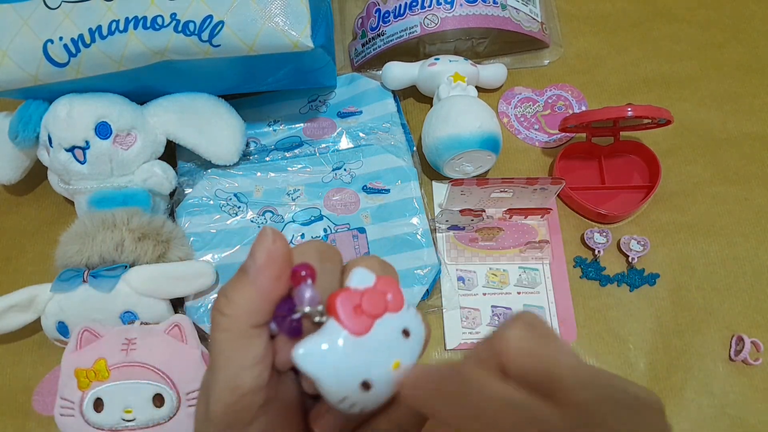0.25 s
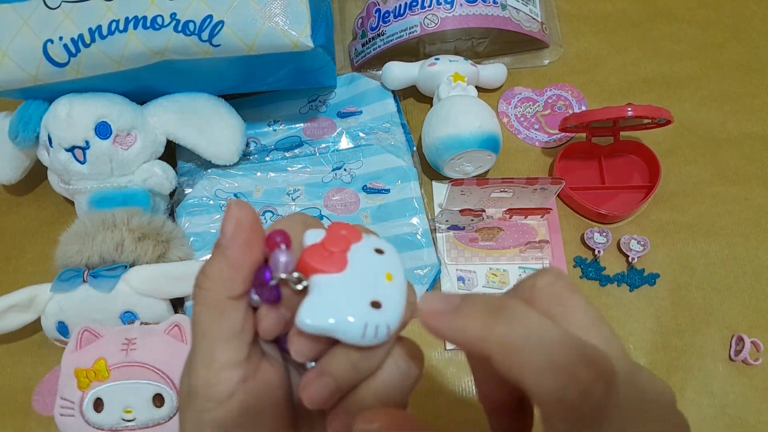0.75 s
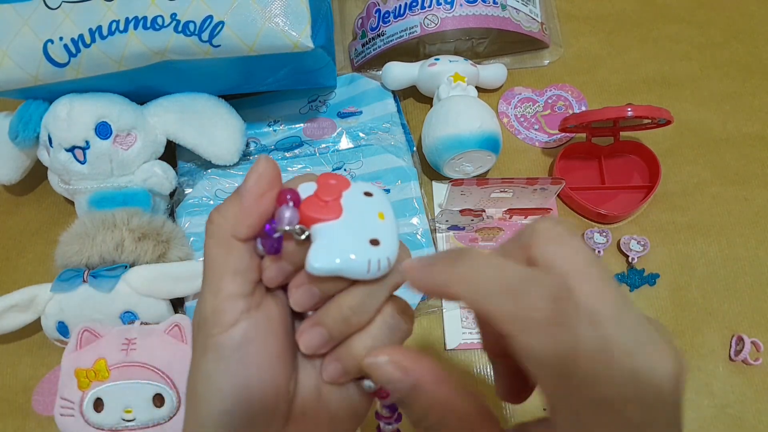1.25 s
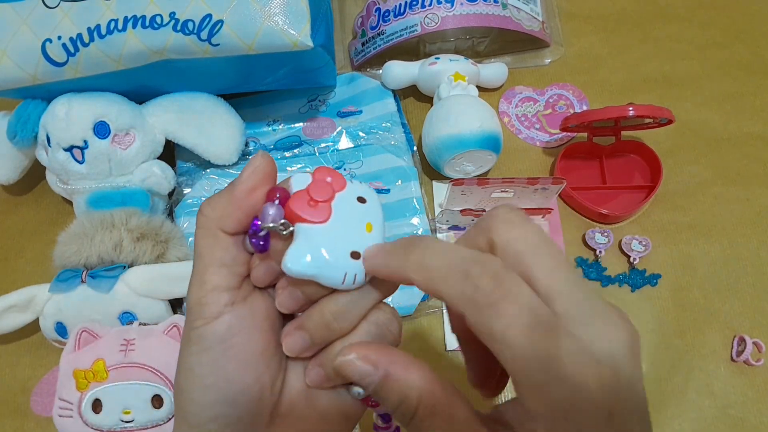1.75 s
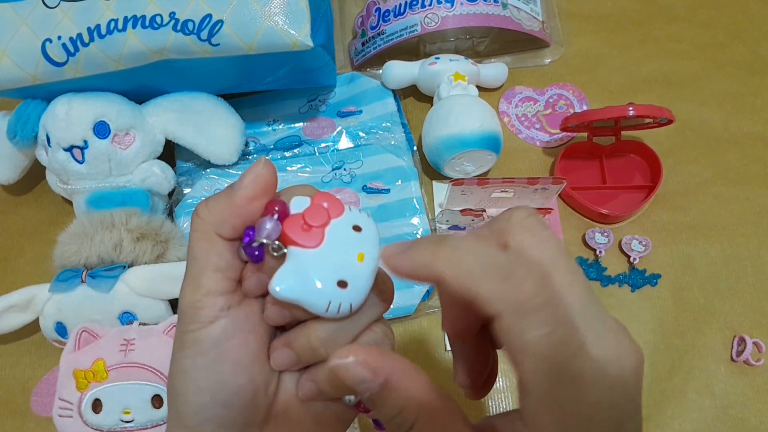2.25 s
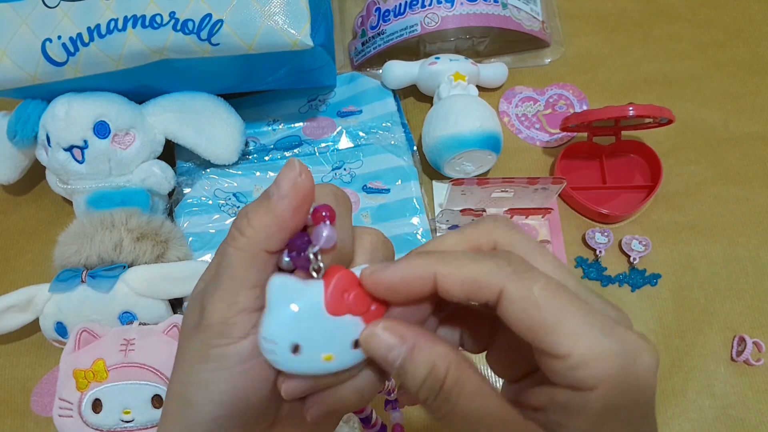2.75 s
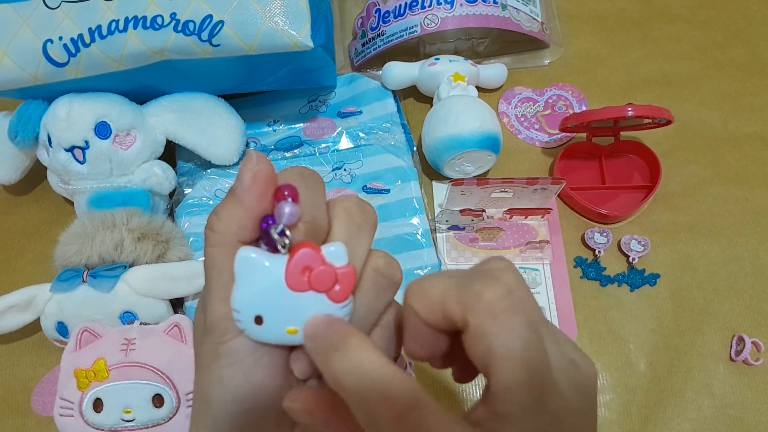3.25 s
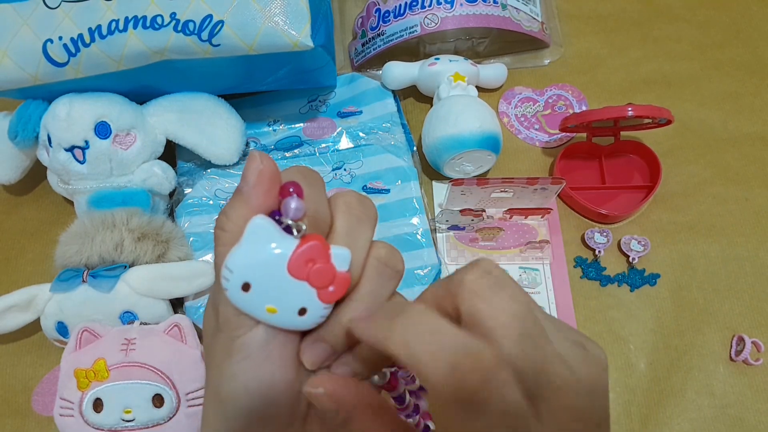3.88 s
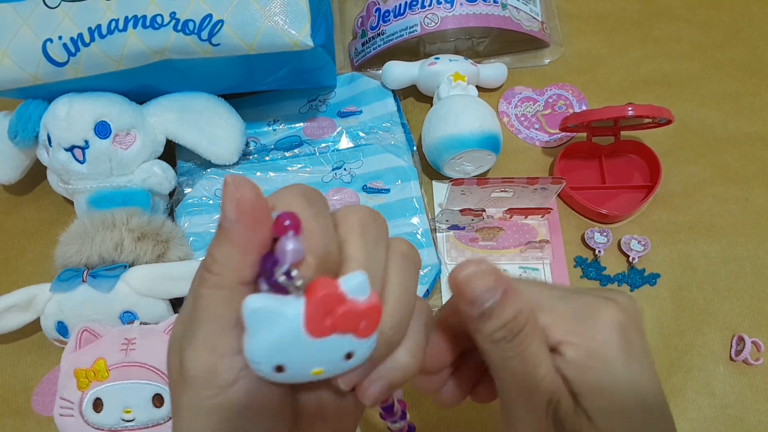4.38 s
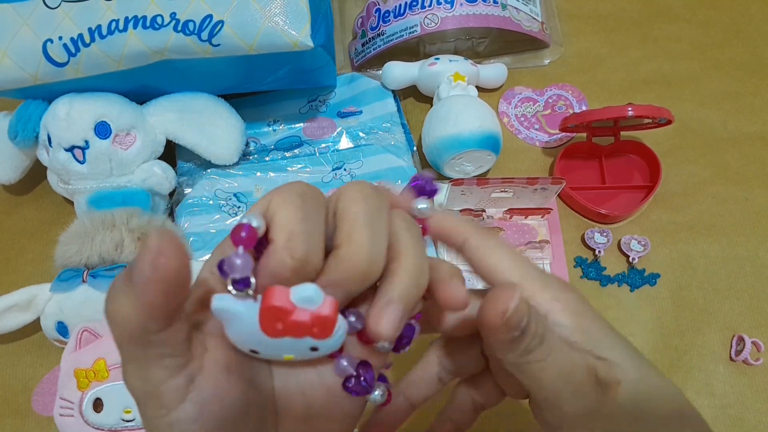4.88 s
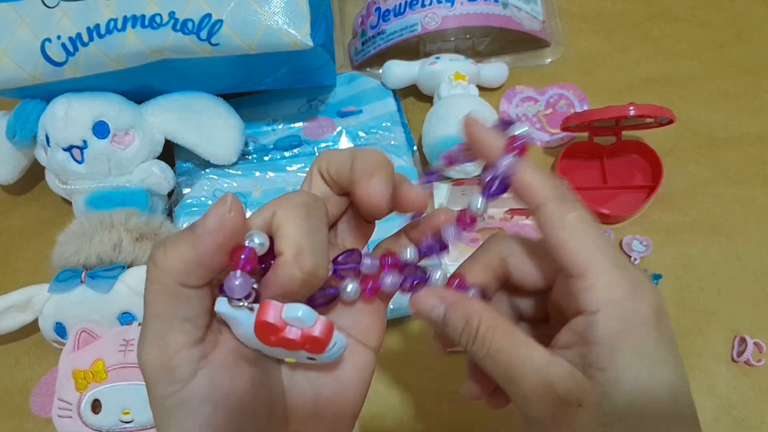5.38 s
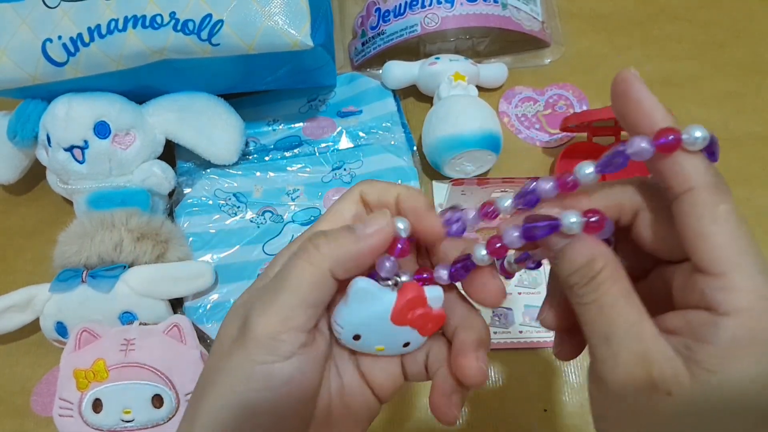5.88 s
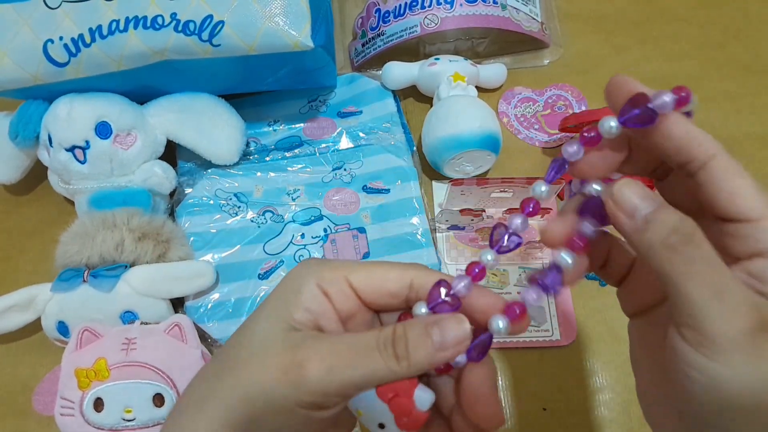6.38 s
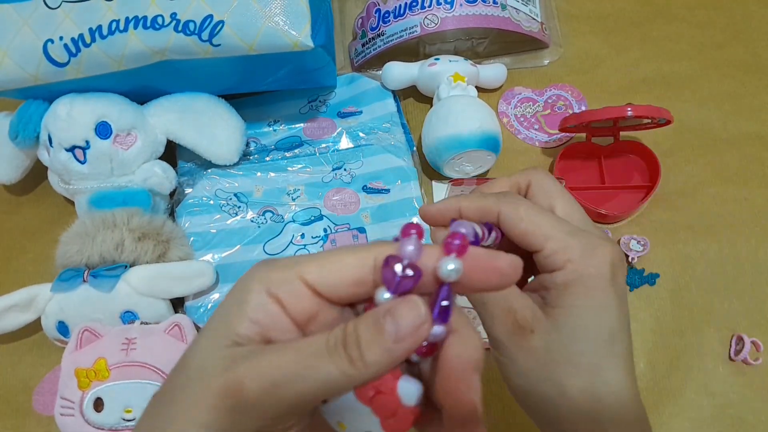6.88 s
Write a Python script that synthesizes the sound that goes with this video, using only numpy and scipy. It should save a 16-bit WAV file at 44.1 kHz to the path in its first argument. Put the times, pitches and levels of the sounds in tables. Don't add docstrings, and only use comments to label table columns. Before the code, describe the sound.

Bright plastic taps come a few per second, some doubled or chattering, with small beads swinging back and clicking after them. Then the handling turns quiet: sparse bead ticks, skin sliding along the string, and one sharp cluster of knocks shortly before six seconds. Close stereo pickup, short room reflections, light hiss and airy fan noise; low wind thumps push at left and right unevenly, the bass sometimes dropping out on one side.

```python
import sys
import numpy as np
from scipy import signal
from scipy.fft import rfft, irfft, next_fast_len
from scipy.io import wavfile
from scipy.ndimage import uniform_filter1d, map_coordinates

SR = 44100
rng = np.random.default_rng(int(sys.argv[2]) if len(sys.argv) > 2 else 0)


def dump_mix(stems):
    frames = np.atleast_2d(stems).T
    limited = np.clip(frames, -1, 1)
    pcm = np.round(limited * 32767).astype(np.int16)
    wavfile.write(sys.argv[1], SR, pcm)


def natural_amplitude(level_db):
    exponent = np.asarray(level_db, float) / 20
    return 10 ** exponent


N = 314433

# start in seconds, peak level in dB, pitch in Hz, time to fall 60 dB in seconds.
PINGS = [(.5757, -35, 6500, 0.027), (.6405, -42, 11800, .03), (0.828, -31.5, 2290, 0.011),
         (.9222, -34, 7100, 0.021), (.9205, -37, 4850, .025), (1.0795, -35, 2490, 0.0096),
         (1.7175, -42, 2310, 0.013), (3.6335, -36, 2220, .015), (3.7715, -35, 5420, 0.012),
         (4.024, -27, 7240, .03), (4.025, -42, 5660, .04), (5.8188, -41, 8250, .025),
         (5.851, -33, 8280, .03), (5.851, -25, 7040, .02), (5.8505, -42, 2344, 0.035),
         (5.8875, -40, 8160, .02), (.0135, -29, 9500, .012), (.1976, -24, 8500, .008),
         (1.9192, -26, 14000, .015), (1.922, -35, 3220, .025), (1.934, -25, 6450, 0.05),
         (2.134, -28, 9960, .015), (2.2352, -42, 8200, .015), (2.4751, -32.5, 5770, .03),
         (3.5908, -30, 7430, .012), (3.5907, -41, 3110, 0.035), (3.634, -30, 7300, .02),
         (3.654, -38, 4800, .022), (5.8445, -36, 11600, .03), (5.8775, -42, 11700, .03),
         (.4044, -32, 6500, .008), (.4044, -35, 10300, .008), (.5758, -30, 9000, .015),
         (.5765, -38, 3250, .03), (1.498, -35, 6500, .012), (5.324, -55, 6000, .008),
         (5.872, -46, 3030, .04)]
TURN_S = 5


def unit(x):
    return x / np.sqrt(np.mean(x ** 2, axis=-1, keepdims=True) + 1e-20)


def along(points, hz):
    f, v = np.transpose(points)
    return np.interp(np.log(hz + 1), np.log(f + 1), v)


def curve(rows):
    return np.interp(np.arange(N) / SR, *np.transpose(rows), left=-120)


def swells(rows, floor_db):
    rise_share, drop_db = 0.77, 8.5
    t = np.arange(N) / SR
    power = natural_amplitude(floor_db) ** 2
    for s, db, spread in rows:
        away = np.where(t < s, (s - t) / rise_share, t - s) / spread
        power = power + natural_amplitude(db - drop_db * np.minimum(away, 8) ** 1.4) ** 2
    return 10 * np.log10(power)


def wobble(rate):
    knots = rng.standard_normal(int(N * rate / SR) + 4)
    return map_coordinates(knots, [np.arange(N) * rate / SR])


def noise(spectrum, alike=((100, 0),)):
    size = next_fast_len(N + 8192)
    hz = np.fft.rfftfreq(size, 1 / SR)
    turn = np.arccos(np.clip(along(alike, hz), -1, 1)) / 2
    coloured = rfft(rng.standard_normal((2, size))) * natural_amplitude(along(spectrum, hz))
    mid, side = coloured * [np.cos(turn), np.sin(turn)]
    return unit(irfft([mid + side, mid - side], size)[:, :N])


def wind_filter(shuts):
    t, edge_s = np.arange(N) / SR, 0.015
    cut_db = np.zeros(N)
    for s, length, db in shuts:
        cut_db += db / 2 * (np.tanh((t - s) / edge_s) - np.tanh((t - s - length) / edge_s))
    return cut_db


def draught():
    # peak time in seconds, peak level in dB, spread in seconds.
    gusts = [(.66, -27.5, 0.048), (2.43, -43, 0.076), (2.53, -40.5, .05), (2.78, -26, 0.056),
             (2.95, -42.5, 0.13), (3.84, -40, 0.15), (4.02, -36, 0.078), (4.1, -32.5, 0.037),
             (4.3, -25.5, 0.078), (4.55, -35.5, 0.38), (4.79, -29.5, 0.099), (4.97, -39, 0.08),
             (5.88, -26.5, 0.084), (6.05, -36.5, 0.13), (6.3, -25.5, 0.057), (6.47, -31.5, .09),
             (6.6, -25, 0.043), (6.73, -24, 0.043), (6.87, -29.5, 0.16), (7.02, -22.5, 0.039)]
    # peak time in seconds, peak level in dB.
    puffs = [(.08, -45), (.27, -50.5), (.53, -43.5), (.78, -45), (.9, -45.5), (1.03, -48), (1.15, -45),
             (1.32, -47.5), (1.43, -44.5), (1.57, -48.5), (1.74, -47.5), (1.94, -49.5), (2.05, -48),
             (2.2, -49), (2.32, -50), (2.65, -59), (3.06, -52), (3.22, -49.5), (3.36, -51.5), (3.47, -58),
             (3.66, -54), (5.15, -49), (5.3, -51), (5.45, -46), (5.6, -50), (5.7, -59)]
    # start in seconds, length in seconds, depth in dB.
    shut_left = [(2.76, .19, 47), (3.7, 0.15, 29), (3.88, 0.059, 19), (4.22, 0.023, 27), (4.31, .44, 41),
                 (5.03, .06, 23), (5.74, 0.12, 38), (5.85, 0.059, 12), (5.92, 0.12, 39), (6.12, 0.23, 39),
                 (6.55, .24, 40), (6.79, 0.08, 14), (7.06, .1, 42)]
    # start in seconds, length in seconds, depth in dB.
    shut_right = [
        (.11, 0.12, 24),
        (.33, 0.16, 17),
        (.84, 0.072, 14),
        (.93, 0.055, 33),
        (1.1, 0.11, 12),
        (3.02, 0.12, 47),
        (3.93, 0.094, 25),
        (5.11, 0.11, 28),
    ]
    # frequency in Hz, level in dB per Hz.
    buffet = [(15, -55), (30, -11), (55, 2.5), (80, 3.5), (120, -4), (170, -15.5), (240, -17), (270, -79)]
    # frequency in Hz, level in dB per Hz.
    hum = [(25, -24), (60, -12), (90, -11), (100, 5), (110, -12.5), (150, -12.5), (230, -27), (270, -52.5)]
    # frequency in Hz, level in dB per Hz.
    spill_colour = [(200, -55), (250, -0.5), (330, -2.5), (500, -10), (800, -43)]
    puff_spread_s, calm_db = 0.07, -59

    flow_db = swells([*gusts, *((s, db, puff_spread_s) for s, db in puffs)], calm_db)
    gusty = 1 / (1 + np.exp(-(flow_db + 49.5) / 4))
    lumps = natural_amplitude(4.3 * np.array([wobble(22), wobble(22)]))
    buffeting = unit(lumps * noise(buffet, [(100, 0.29)]))
    bass = np.sqrt(gusty) * buffeting + np.sqrt(1 - gusty) * noise(hum, [(100, 0.92)])
    bass /= np.abs(uniform_filter1d(bass ** 2, SR // 12)) ** 0.43
    spill_db = 0.85 * flow_db - 30.5 + 4.1 * wobble(14)
    spill = natural_amplitude(spill_db) * noise(spill_colour, [(300, 0.17)])
    port_db = [[-2], [0]] - np.array([wind_filter(shut_left), wind_filter(shut_right)])
    return natural_amplitude(flow_db + port_db) * bass + spill


def fan():
    # frequency in Hz, level in dB per Hz.
    air_colour = [(200, -53.5), (250, 0), (295, -8.5), (316, 5), (340, -8.5), (465, 2), (520, -4.5),
                  (640, 1.5), (760, -9.5), (950, -6.5), (1100, -12.5), (1350, -6.5), (1650, -12),
                  (3500, -30)]
    # time in seconds, level in dB.
    fan_swell = [(0, -57.5), (.3, -62.5), (.7, -59.5), (1.6, -59), (2.55, -59), (2.63, -66), (2.8, -57),
                 (3.1, -64.5), (3.7, -58), (4.2, -61), (4.8, -58.5), (5.2, -62), (6.2, -58.5),
                 (7.13, -59.5)]
    # frequency in Hz, likeness from -1 to 1.
    likeness = [(250, 1), (640, 0.42), (950, -0.26), (1400, -0.55), (2500, 0.26), (4000, -0.81)]
    # frequency in Hz, level in dB per Hz.
    hiss_colour = [(1500, -27), (2500, 4.5), (4000, 3.5), (7000, 0.5), (10000, -1), (11500, -11),
                   (15500, -1), (16500, -11)]

    air_db = curve(fan_swell) + 2.5 + 1.82 * wobble(13) + 1.52 * wobble(6.5)
    air = natural_amplitude(air_db) * noise([*air_colour, (9000, -36.0)], likeness)
    return air + natural_amplitude(-68.5 + 0.41 * wobble(2.9)) * noise(hiss_colour)


def fingers():
    # peak time in seconds, peak level in dB, spread in seconds.
    strokes = [
        (4.65, -66, 0.16),
        (4.98, -66, 0.092),
        (5.6, -73, 0.37),
        (6.0, -67, 0.11),
        (6.35, -72, .1),
        (6.85, -68, 0.12),
    ]
    # frequency in Hz, level in dB per Hz.
    rustle = [(3000, -39), (5000, -22), (7500, 3.5), (10000, -3), (13000, -8), (16500, -47.5)]
    # peak time in seconds, peak level in dB, spread in seconds.
    brushes = [
        (5.93, -57.5, 0.084),
        (6.34, -62, 0.047),
    ]
    # frequency in Hz, level in dB per Hz.
    drag = [(1800, -25), (2800, 5), (7000, -12), (11000, -30)]

    slide = natural_amplitude(swells(strokes, -110) + 4.0 * wobble(30)) * noise(rustle, [(7000, 0.057)])
    return slide + natural_amplitude(swells(brushes, -110) + 1.9 * wobble(60)) * noise(drag)


def pings(rows, lag):
    out, t = np.zeros((3, N + SR)), np.arange(2048) / SR
    for s, db, hz, t60 in rows:
        rise = 1 - np.exp(-t / 0.00029)
        ring = rise * natural_amplitude(db - 60 * t / t60) * np.sin(2 * np.pi * hz * t)
        for path, (delay, path_db) in enumerate([(0, 1.2), (lag, -1.2), (0, -9.5)]):
            start = round(s * SR) + delay
            out[path, start:start + len(t)] += natural_amplitude(path_db) * ring
    return out[:, :N]


def clicks(contacts, lag, hollow_t60, pitch_scatter, room_share, crack_db):
    # frequency in Hz, level in dB, time to fall 60 dB in seconds.
    shell_modes = [(2250, -14, .01), (3900, -9, .008), (4700, -5, .009), (5800, -3, .014), (6400, -5, .012),
                   (7100, -3, .011), (8200, -1, .012), (9100, -4, .008), (10900, -5, .007),
                   (12700, -5, .007), (13800, -5, .007)]
    # frequency in Hz, level in dB.
    crack_colour = [(500, -8), (1200, -24.5), (2200, -11), (3100, -8), (3700, -12.5), (4400, -7.5),
                    (6500, 2), (13500, 7), (17000, -3)]

    out, t = np.zeros((3, N + SR)), np.arange(1536) / SR
    grid = np.fft.rfftfreq(len(t), 1 / SR)
    hz, level_db, t60 = (column[:, None] for column in np.transpose(shell_modes))
    for s, db, ring_hz, hollow_db, sparkle_db in contacts:
        soft = np.clip(-(db + 15.5) / 30, 0, 1)
        rise = 1 - np.exp(-(t / (0.00056 + 0.000057 * soft)) ** 2)
        detune, scatter = rng.standard_normal(hz.shape), rng.standard_normal((4, *hz.shape))

        near_db = -(6 + 10 * soft) * np.abs(np.log2(hz / ring_hz))
        spot_db = np.where(hz > 10000, sparkle_db - 10.0, near_db)
        modes = natural_amplitude(-60 * t / t60) * np.sin(2 * np.pi * hz * (1 + 0.023 * detune) * t)
        strength_db = 2.5 * scatter[0] + 2.5 * scatter[1:]
        shell = (natural_amplitude(level_db + spot_db + strength_db) * modes).sum(axis=1)
        bead = natural_amplitude(-60 * t / .0075) * np.sin(2 * np.pi * ring_hz * t)

        shared, own = rng.standard_normal(len(t)), rng.standard_normal((3, len(t)))
        colour_db = along(crack_colour, grid) + (sparkle_db + 0.5) / (1 + (10500 / (grid + 1)) ** 8)
        colour_db -= 7 * soft * np.abs(np.log2((grid + 1) / ring_hz))
        crack = natural_amplitude(-60 * t / .0095) * unit(irfft(rfft(shared + .7 * own) * natural_amplitude(colour_db)))
        crack = natural_amplitude([[0], [0], [-6]] - 1.0 * soft + crack_db) * crack

        snap = unit(np.roll(irfft(natural_amplitude(colour_db)), 20))
        touch = natural_amplitude([[-17], [-17.5], [-15.5]] - 2 * soft) * snap

        rings = np.array([[1], [1], [.28]]) * (natural_amplitude(-3.5) * shell + natural_amplitude(3.5) * bead)
        hard = rise * (rings + crack + touch)
        hard /= np.sqrt(np.mean(hard[:2, :80] ** 2))

        hollow_hz = 3040 * (1 + pitch_scatter * detune[0])
        hollow_level = (1 - np.exp(-t / .002)) * natural_amplitude(hollow_db + 6 - 60 * t / hollow_t60)
        hollow = hollow_level * np.sin(2 * np.pi * hollow_hz * t + .3 * scatter[1:, 0])
        hollow *= [[1], [1], [room_share]]

        for path, (delay, path_db) in enumerate([(0, 1.3), (lag, -1.3), (0, 4 * soft)]):
            start = round(s * SR) + delay
            out[path, start:start + len(t)] += natural_amplitude(db - 3.5 + path_db) * (hard + hollow)[path]
    return out[:, :N]


def handling():
    rattle = [(4.342, -49.5, 8150), (4.359, -51, 8000), (4.4046, -44.5, 9000), (4.435, -51, 6560),
              (4.619, -51, 6600), (4.7929, -36, 10600), (4.8128, -47, 10200), (4.935, -47.5, 7680),
              (4.9667, -57, 9050), (5.237, -52, 9100), (5.2599, -49, 9100), (5.305, -58, 5550),
              (5.323, -48.5, 8150), (5.3996, -38.5, 8030), (5.4797, -48.5, 7440), (5.615, -46.5, 7880),
              (5.6438, -42.5, 8800), (5.6866, -53, 6960), (6.309, -47, 7430), (6.3312, -58, 6500),
              (6.4806, -58, 7730), (6.594, -47.5, 8940), (6.77, -57, 8100), (6.835, -53, 4980),
              (4.723, -57, 7500), (5.277, -58, 6500), (5.284, -58, 6000), (5.3165, -60, 6500),
              (5.5255, -56, 7000), (6.8345, -55, 9700)]
    # start in seconds, peak level in dB, ring pitch in Hz,
    # hollow ring in dB, sparkle (treble) in dB.
    knocks = [(4.4537, -39.5, 6200, -2, -12), (4.4574, -48, 6600, -2, -16), (4.479, -54, 7500, -15, -11),
              (4.6, -36.5, 6260, -18, -9), (4.607, -47, 8200, -18, -12), (4.628, -52, 6400, -20, -16),
              (5.806, -52, 7800, -6, -10), (5.8112, -47, 8500, -1, -8), (5.82, -39, 8250, -15, -14),
              (5.8228, -41, 8430, -13, -6), (5.8287, -34.5, 8260, -4, -6), (5.8433, -30, 8400, -1, -5),
              (5.8466, -30, 11400, 0, -1), (5.8501, -19, 8200, -8.5, -6), (5.8532, -21, 8230, -9, -3),
              (5.8557, -26.5, 7100, -12, -11), (5.862, -37, 8360, -11, -8), (5.878, -40, 11600, -6, -4),
              (5.8859, -37.5, 8350, -1, -12), (5.8902, -38, 8000, 5, -12), (5.9, -47, 8300, 4, -14),
              (5.909, -50, 7500, 0, -14), (5.9235, -50, 6500, -2, -17), (5.94, -52, 7000, 6, -15),
              (6.311, -54, 4500, -12, -23)]
    hanging = dict(hollow_t60=.036, pitch_scatter=.008, room_share=.07, crack_db=-5)
    rattle_lag, knock_lag = 7, 5

    beads = []
    for s, db, hz in rattle:
        sparkle_db = -6 + 13 * np.log2(hz / 8000)
        beads.append((s, db, hz, -27, sparkle_db))
    facing = clicks([k for k in knocks if k[0] < TURN_S], 0, **hanging)
    turned = clicks([k for k in knocks if k[0] > TURN_S], knock_lag, **hanging)
    singing = pings([p for p in PINGS if p[0] > TURN_S], knock_lag)
    return clicks(beads, rattle_lag, **hanging) + facing + turned + singing


def tapping():
    # start in seconds, peak level in dB, ring pitch in Hz,
    # hollow ring in dB, sparkle (treble) in dB.
    blows = [(0.0129, -20, 7550, -14, -13), (0.1972, -18, 9730, -39, -14), (0.4039, -29.5, 6900, -21, -11),
             (0.5753, -21.5, 6620, -2, -14), (0.8276, -19.5, 7880, -7, -8), (1.0788, -19.5, 7700, -16, -8),
             (1.2968, -29, 6940, -45.5, -7), (1.5016, -29, 8840, -42, -15), (1.7165, -19, 7660, -27, -12),
             (1.9188, -15, 6460, -35, 4), (1.9338, -19, 6630, -18, -17), (2.1332, -17, 6160, -12, 2),
             (2.139, -26, 6680, -6, 0), (2.475, -31, 8570, -36, -21), (2.7264, -30.5, 8440, -11, -14),
             (3.211, -38, 7570, -5, -2), (3.3874, -26, 4830, -26, -23), (3.3921, -20, 8300, -23, -6.5),
             (3.591, -24.5, 4920, -11, -17), (3.605, -32, 9400, -15, -6), (3.6333, -25.5, 4520, -6.5, -8),
             (3.771, -21.5, 5270, -19, -18), (3.827, -30, 5550, -6, -25), (4.0232, -31.5, 5460, -30, -16)]
    # start in seconds, peak level in dB,
    # ring pitch in Hz, sparkle in dB.
    chatter = [(0.3965, -37, 7400, -14), (.394, -48, 9500, -8), (0.8249, -21.5, 8100, -16),
               (1.0733, -24.5, 6300, -18), (1.0758, -22.5, 8100, -19), (1.302, -32.5, 6400, -30),
               (1.3057, -46, 6440, 4), (1.4979, -32, 7000, -12), (1.7186, -20, 10550, -4),
               (1.7201, -21, 8940, -9), (1.7217, -21.5, 7450, -7), (1.736, -37, 11000, -12),
               (1.916, -19.5, 6000, -2), (1.9223, -17.5, 6450, -12), (1.923, -22.5, 8000, 5),
               (2.127, -38, 6800, -18), (2.13, -21.5, 10670, -11), (2.4773, -35, 6850, -2),
               (2.715, -41.5, 8400, -19), (3.2083, -47, 8500, -18), (3.594, -31, 8600, 4),
               (3.629, -22, 7170, -11), (3.823, -32, 8160, 6), (3.83, -33, 11660, 4),
               (4.0121, -48, 7300, -8), (.572, -36, 8000, -10), (.83, -23.5, 7000, -4),
               (.842, -33, 7000, -4), (3.3944, -31, 8000, -2), (3.773, -26, 7800, -4)]
    # start in seconds, peak level in dB,
    # ring pitch in Hz, sparkle in dB.
    bead_swings = [(0.4534, -43, 6400, -5), (0.4655, -43.5, 6800, -2), (0.64, -35.5, 6760, -2),
                   (0.682, -38, 6700, -3), (.6868, -38, 6500, 0), (0.6898, -33.5, 6400, -6),
                   (0.7132, -34.5, 6300, -19), (0.8742, -35, 6360, 3), (0.8937, -38, 8100, -24),
                   (0.9107, -50, 8200, 2), (0.9191, -36, 7600, -4), (0.9215, -30.5, 7260, -32),
                   (1.1393, -38, 8200, 1), (1.145, -42, 6800, -8), (1.153, -33, 6290, -19),
                   (1.3598, -49, 6200, -13), (1.552, -38.5, 8700, -11.5), (1.576, -40, 7000, -22),
                   (1.982, -36.5, 5940, -24.5), (2.0047, -38, 7050, -12), (2.0314, -38, 6900, -23),
                   (2.1736, -35, 6240, -16), (2.1981, -27, 6170, -14), (2.235, -32.5, 5960, -17),
                   (2.33, -51.5, 6760, -35), (2.374, -54, 6400, -22), (2.3885, -57, 6300, -21),
                   (2.541, -45, 6630, -6), (2.609, -45.5, 6550, -11), (2.8517, -45.5, 7700, -21),
                   (3.2643, -47.5, 7540, 7), (.658, -45, 8800, -15), (1.7705, -46, 6000, -8),
                   (2.536, -48, 6500, -20), (3.98, -55, 8500, -12)]
    # start in seconds, peak level in dB,
    # pitch in Hz, time to fall 60 dB in seconds.
    thuds = [
        (.0132, -40, 1000, .004),
        (.1974, -34, 1300, .004),
        (.1975, -32, 2400, 0.0034),
        (1.917, -40, 1300, .004),
        (3.3874, -34, 1100, 0.0048),
        (3.5905, -30, 1000, 0.0046),
        (3.771, -32, 1100, 0.0053),
    ]
    held = dict(hollow_t60=.012, pitch_scatter=.025, room_share=.3, crack_db=0)
    lag = 8
    rebound_s, rebound_db = 0.0016, -12.5

    grazes = [(s, db, hz, -24, sparkle) for s, db, hz, sparkle in chatter]
    swings = [(s, db, hz, -27, sparkle) for s, db, hz, sparkle in bead_swings]
    rebounds = [(s + rebound_s, db + rebound_db, *colour) for s, db, *colour in swings]
    singing = [p for p in PINGS if p[0] < TURN_S]
    return clicks([*blows, *grazes, *swings, *rebounds], lag, **held) + pings([*thuds, *singing], lag)


def walls(x):
    # delay in seconds, level in dB.
    surfaces = [
        (.0125, -23.5),
        (.0142, -25),
        (0.018, -22.5),
    ]
    echoes = np.zeros((2, N))
    for s, db in surfaces:
        echoes += natural_amplitude(db) * np.pad(x[::-1], ((0, 0), (round(s * SR), 0)))[:, :N]
    return echoes


def room(x):
    # frequency in Hz, time to fall 60 dB in seconds.
    decay = [(1000, 0.49), (3000, 0.35), (7000, 0.19), (12000, 0.27), (16000, 0.23)]
    out, step = np.zeros((2, N + SR)), SR // 8
    for start in range(0, N, step):
        hz, t, z = signal.stft(rng.standard_normal((2, SR // 2)), SR, nperseg=128)
        fill = 7.8 + 1 / (1 + np.exp(-(t - .013) / 0.016))
        fading = fill * natural_amplitude(-60 * t / along(decay, hz)[:, None])
        tail = signal.istft(z * fading, SR, nperseg=128)[1]
        wet = signal.fftconvolve(x[:, start:start + step], tail / np.linalg.norm(tail[0]), axes=1)
        out[:, start:start + wet.shape[1]] += wet
    return out[:, :N]


def scene():
    air = draught() + fan() + fingers()
    beads = handling() + tapping()
    direct = beads[:2]
    return direct + walls(direct) + room(beads[2:]) + air


def low_pass(x):
    return signal.sosfilt(signal.butter(12, 17020, fs=SR, output="sos"), x)


def record(dry):
    top_hz = 15900
    hz = np.fft.rfftfreq(N, 1 / SR)
    roll_off = natural_amplitude(-30 * np.clip((hz - top_hz + 150) / 300, 0, 1))
    return low_pass(irfft(rfft(dry) * roll_off, N))


dry = scene()
out = record(dry)
dump_mix(out)
```